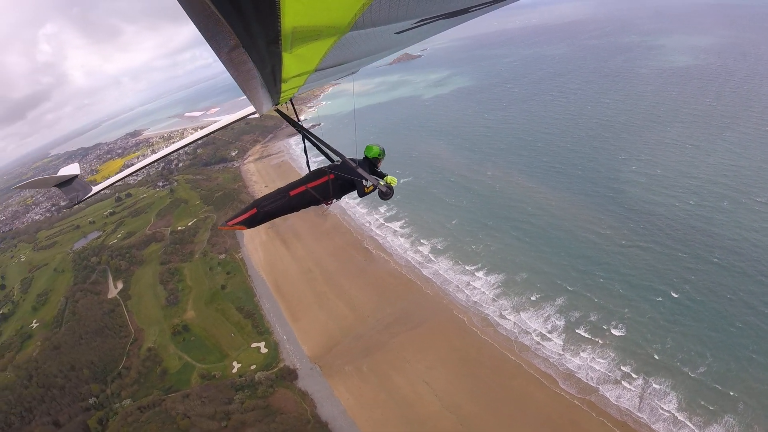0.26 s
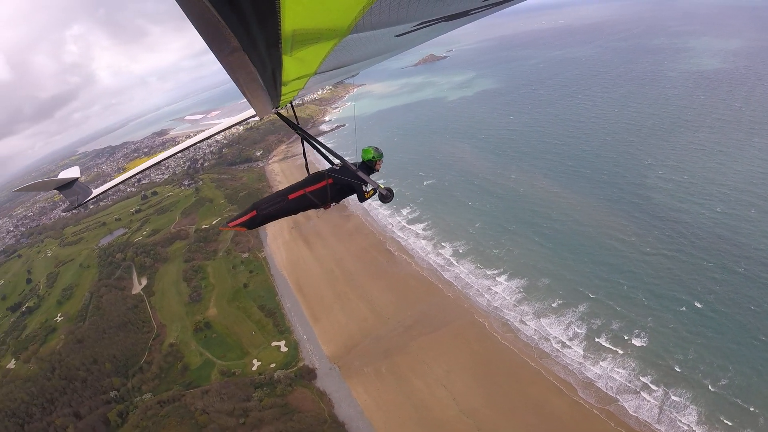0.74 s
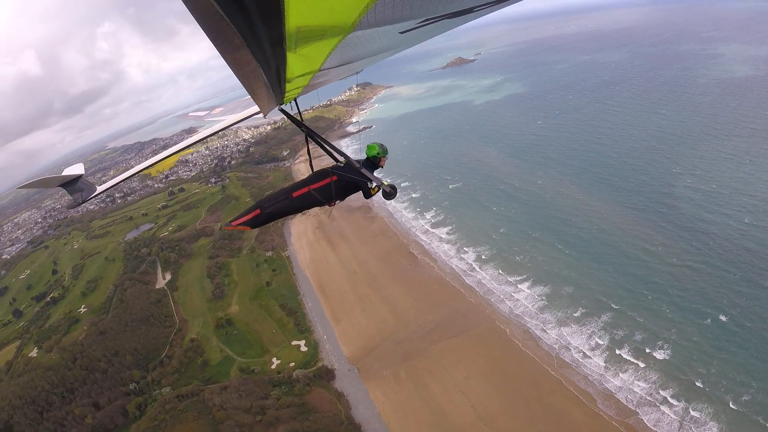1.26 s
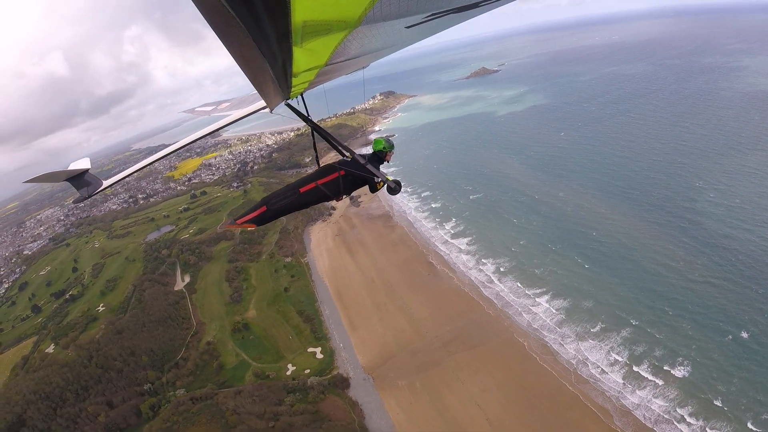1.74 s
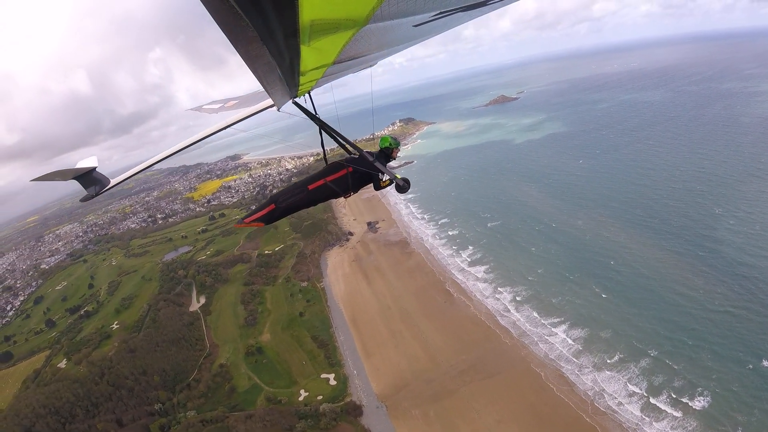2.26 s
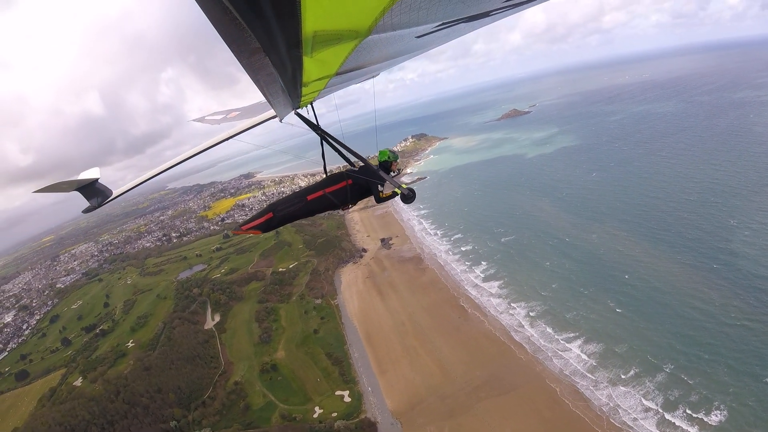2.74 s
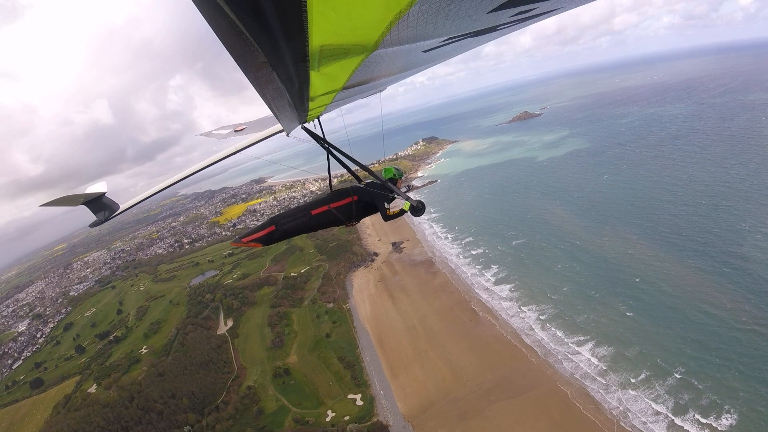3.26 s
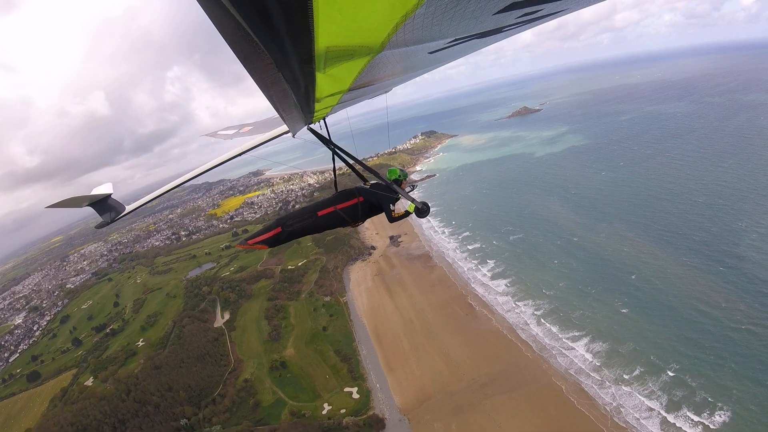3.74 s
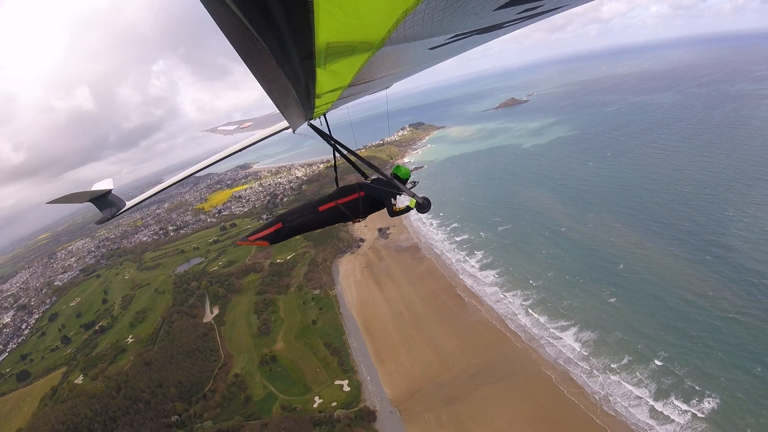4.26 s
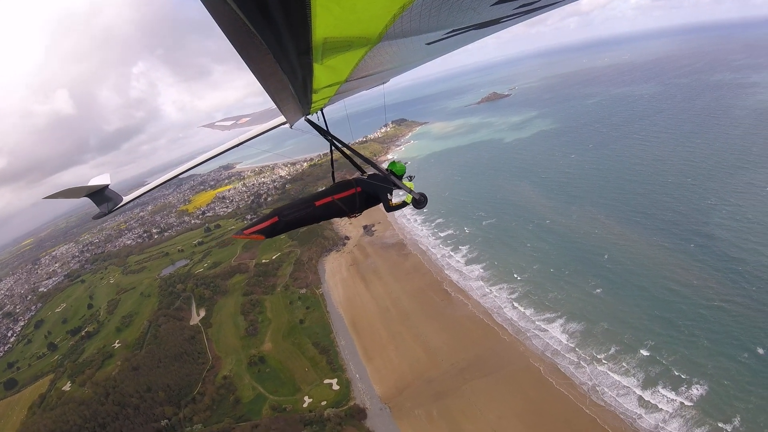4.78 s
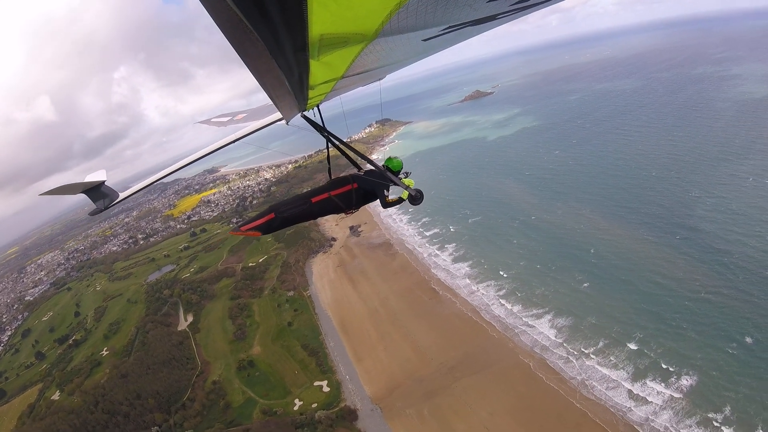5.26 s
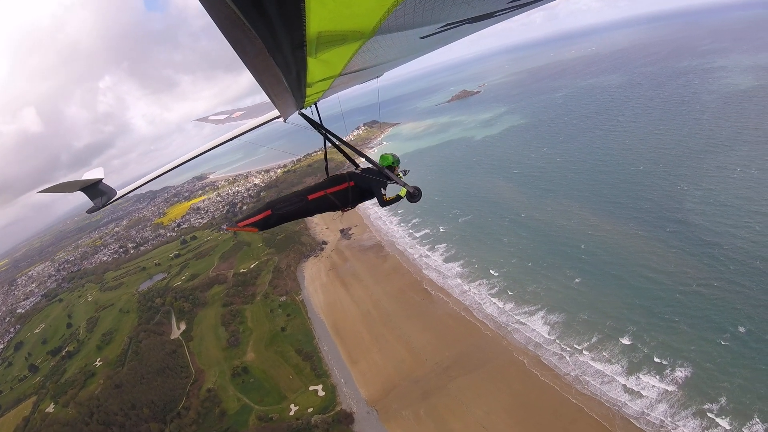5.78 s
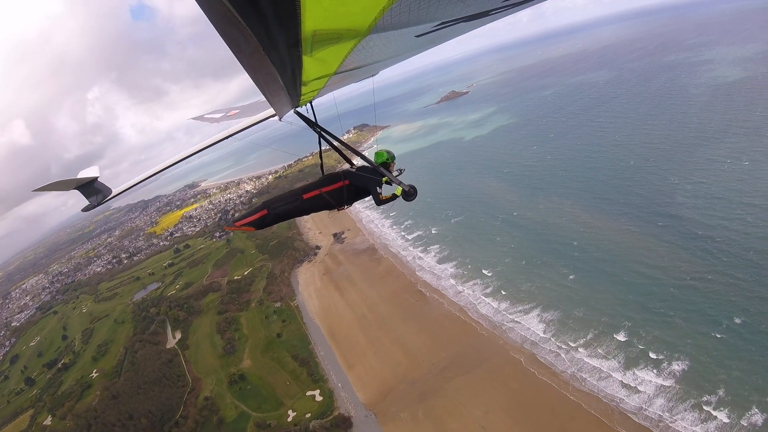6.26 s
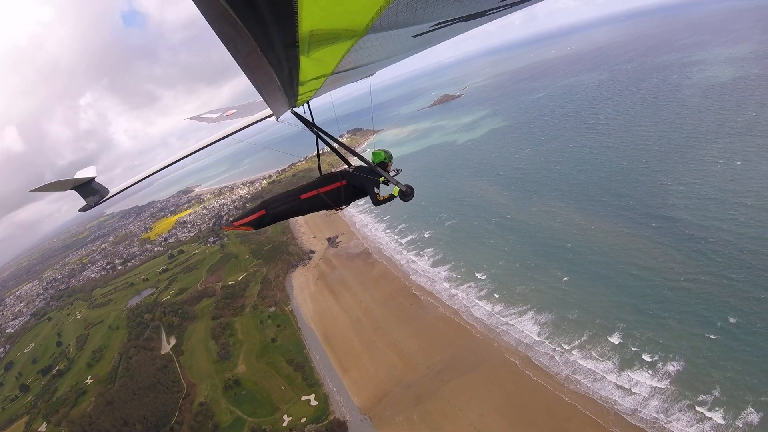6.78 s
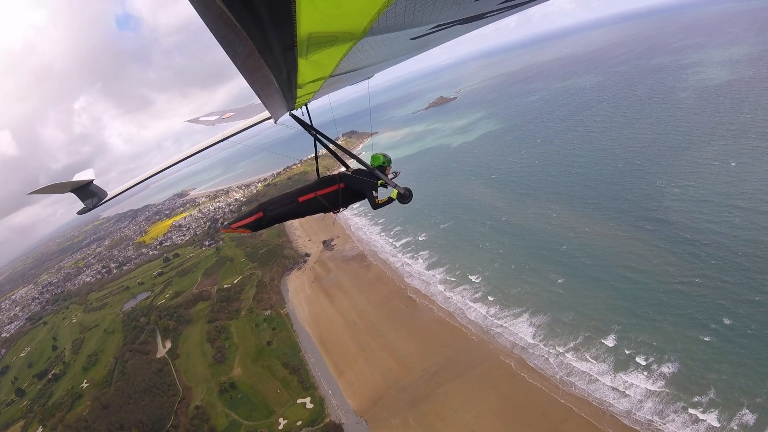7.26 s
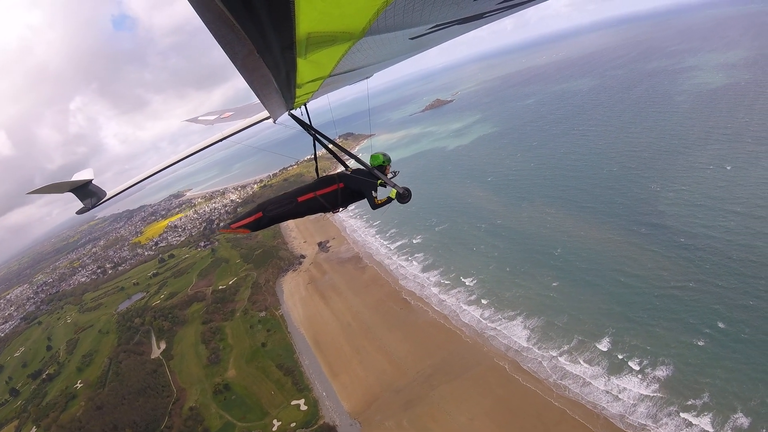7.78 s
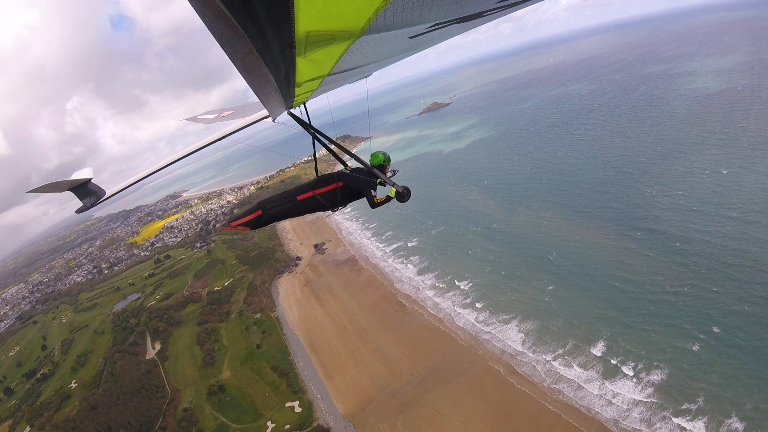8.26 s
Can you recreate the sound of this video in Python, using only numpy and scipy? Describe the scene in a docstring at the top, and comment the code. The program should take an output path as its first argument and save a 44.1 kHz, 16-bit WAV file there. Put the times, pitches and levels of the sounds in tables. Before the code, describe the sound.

Loud, lumpy wind buffets a microphone on a hang glider's wing, hissing at first, then roaring lower, with small ticks from the camera mount.

```python
"""A loud, lumpy wind with a hissing edge: a camera rides the wing of a hang glider easing out of a turn.
Eddies buffet the microphone as slow noise swings, and a fast limiter holds their bass down. Airspeed drives
filtered noise for the rush and hiss along the housing; as the wing levels, the camera slides into a roaring
wake. Gusts lift or dip these bands, and short filtered knocks make the mount tick over a faint random crackle."""
import sys
import numpy as np
from scipy import signal
from scipy.fft import rfft, irfft
from scipy.io import wavfile

SR = 44100
rng = np.random.default_rng(int(sys.argv[2]) if len(sys.argv) > 2 else 0)


def master(y):
    """Save y as 16-bit WAV."""
    cut = np.clip(np.atleast_2d(y).T, -1, 1)
    pcm = np.round(cut * 32767)  # scale
    wavfile.write(sys.argv[1], SR, pcm.astype(np.int16))


N = 375732

# All spectra are relative levels per Hz: the filtered sound is scaled to an rms or a peak afterwards.
# broad crack of the mount: (f/Hz, level/dB)
CRACK_SPECTRUM = [(1000, -12.5), (2500, 1.5), (4300, -2), (7000, -3.5), (8600, -15), (10000, -25),
                  (12000, -39), (15500, -45.5)]


def gain_of(db):
    """Turns decibels into amplitude."""
    return 10 ** (np.asarray(db) / 20)


def evened(x):
    """Scales a signal to an rms of one."""
    return x / np.sqrt(np.mean(x ** 2) + 1e-20)


def coloured(x, spectrum):
    """Filters x by a (f/Hz, level/dB) spectrum, without delay, and scales it to an rms of one."""
    hz, db = np.transpose(spectrum)
    f = np.fft.rfftfreq(len(x), 1 / SR)
    # straight lines in dB over log frequency
    level_db = np.interp(np.log(f + 1), np.log(hz + 1), db, left=-90, right=-110)
    return evened(irfft(rfft(x) * gain_of(level_db), len(x)))


def noise(spectrum):
    """Makes steady noise of the given colour, rms one."""
    return coloured(rng.standard_normal(N), spectrum)


def low_pass(x, hz, order):
    """Low-passes a signal without delay."""
    f = np.fft.rfftfreq(len(x), 1 / SR)
    return irfft(rfft(x) / np.sqrt(1 + (f / hz) ** (2 * order)), len(x))


def wander(hz):
    """Random motion of rms one, mostly slower than hz."""
    return evened(low_pass(rng.standard_normal(N), hz, order=2))


def curve(points):
    """Joins (t/s, level/dB) points by straight lines, sample by sample."""
    return np.interp(np.arange(N) / SR, *np.transpose(points))


def swell(middle_s, length_s, db):
    """A smooth rise and fall, or dip, in dB; length_s is its whole width."""
    phase = np.clip((np.arange(N) / SR - middle_s) / length_s, -0.5, 0.5)
    return db * np.cos(np.pi * phase) ** 2


def flight(cruise_db=-51, wake_from_s=2.3, wake_to_s=3.46):
    """Airspeed (dB over cruise), depth in the wake (0-1) and the gusts' lift of eddies, roar and rush (dB)."""
    # airspeed, given as the level of the hiss that it raises: (t/s, level/dB)
    airspeed = [(0.0, -45.5), (1.47, -45), (2.37, -47), (3.08, -53), (4.29, -53.5), (4.62, -55),
                (6.93, -50.5), (7.43, -51.5), (8.52, -51)]
    # gusts: (middle t/s, length/s, lift of the eddies/dB, lift of the roar/dB, lift of the rush/dB)
    gusts = [(0.85, 0.85, 1.5, 3.5, 1.1), (1.096, 0.46, 2, 3.5, 1.5), (1.22, 0.14, 1.5, 3.5, 1.5),
             (1.607, 0.58, 1.5, 1, 1.9), (2.014, 0.14, 0.5, -5, 0.5), (2.35, 0.45, 0.5, 3.5, 0.5),
             (2.85, 0.64, -1, 0, 0.8), (3.33, 0.77, 3.5, 2, 3), (3.633, 0.21, 3, 0, 0.5),
             (3.87, 0.24, 3.5, 2.5, -1), (4.033, 0.13, 1.5, 1.5, 0), (4.263, 0.14, 0, 2, 1),
             (4.704, 0.078, 5, 1.5, -1), (5.55, 0.52, 3, 1, -0.5), (8.01, 0.068, 0, 2, 0.8),
             (8.357, 0.13, 0.5, 1, 0.8)]
    speed_db = curve(airspeed) - cruise_db
    # the camera slides into the wake as the wing levels
    wake = np.interp(np.arange(N) / SR, [wake_from_s, wake_to_s], [0, 1])
    lifts_db = sum(swell(middle_s, length_s, np.array(dbs)[:, None]) for middle_s, length_s, *dbs in gusts)
    return speed_db, wake, *lifts_db


def limited_bass(pressure, ceiling_db=-5.0, limiter_hz=80):
    """A fast limiter: the smoothed envelope turns down whatever nears the ceiling."""
    load = low_pass(abs(signal.hilbert(pressure)), limiter_hz, order=2) / gain_of(ceiling_db)
    return pressure / (1 + load ** 6) ** (1 / 6)


def buffet(speed_db, roll_db, surge_db, buffet_db=-11.5, heave_db=-21.5, lumpy_db=1.0, swell_db=-1.0,
           upper_hz=100, crossover_hz=148):
    """Lumpy pressure swings over a slow heave of the air, their tallest peaks flattened by the limiter."""
    # pressure swings of the buffeting: (f/Hz, level/dB)
    swing_spectrum = [(20, -27), (38, -11.5), (50, -1), (62, 1), (90, 0.5), (135, -2), (160, -13.5),
                      (200, -36.5)]
    # slow heave of the air: (f/Hz, level/dB)
    heave_spectrum = [(5, -18), (11, 0.5), (22, -8.5), (36, 2), (50, -3), (65, -12), (100, -48.5)]
    # gain of the upper bass in the buffeting: (t/s, level/dB)
    upper_bass = [(0.1, -4.5), (0.5, 3), (1.1, 2), (1.4, -4), (2.3, 0), (3.2, -0.5), (4.7, 2.5),
                  (5.0, -0.5), (5.5, -1.5), (6.3, -3.5), (7.2, 2.5), (7.8, -1), (8.5, 5.5)]
    swing_level_db = buffet_db + 0.051 * speed_db + lumpy_db * wander(hz=15)
    swings = noise(swing_spectrum) * gain_of(swing_level_db)
    deep = low_pass(swings, upper_hz, order=6)
    upper = (swings - deep) * gain_of(curve(upper_bass))
    heave_level_db = heave_db + 0.8 * roll_db + surge_db + swell_db * wander(hz=0.95)
    heave = noise(heave_spectrum) * gain_of(heave_level_db)
    held = limited_bass(deep + upper + heave)
    return low_pass(held, crossover_hz, order=12)


def airflow(speed_db, wake, gust_eddy_db, gust_roar_db, gust_rush_db, eddy_db=-27.5, roar_db=-38.5, rush_db=-32.0,
            wake_eddy_db=4.5, wake_roar_db=10.5, eddy_puff_db=1.0, roar_puff_db=0.5):
    """Large eddies, wake roar and housing rush follow speed and gusts, and tremble with one turbulence."""
    # large eddies: (f/Hz, level/dB)
    eddy_spectrum = [(60, -12.5), (150, 3.5), (210, 0), (280, -2.5), (370, -8), (520, -14), (1200, -41)]
    # roar of the wake: (f/Hz, level/dB)
    roar_spectrum = [(200, -18.5), (360, -7), (460, 3), (620, 2.5), (800, -0.5), (1100, -10.5),
                     (1800, -17.5), (4000, -58.5)]
    # rush along the housing: (f/Hz, level/dB)
    rush_spectrum = [(200, -11.5), (500, -10), (800, -1), (1100, 1.5), (1500, -3), (2000, -10),
                     (2800, -20.5), (3700, -28), (4700, -35.5), (6000, -44), (12000, -80)]
    turbulence = wander(hz=35)
    puffs = wander(hz=20)
    eddy_level_db = eddy_db + 0.91 * speed_db + wake_eddy_db * wake + gust_eddy_db
    eddy_level_db = eddy_level_db + 1.0 * turbulence + eddy_puff_db * puffs
    roar_level_db = roar_db + 0.67 * speed_db + wake_roar_db * wake + gust_roar_db
    roar_level_db = roar_level_db + 1.3 * turbulence + roar_puff_db * puffs
    rush_level_db = rush_db + 0.76 * speed_db + gust_rush_db + 0.77 * turbulence
    eddies = noise(eddy_spectrum) * gain_of(eddy_level_db)
    roar = noise(roar_spectrum) * gain_of(roar_level_db)
    rush = noise(rush_spectrum) * gain_of(rush_level_db)
    return eddies + roar + rush


def flutter(speed_db, wake, lift_db, flutter_db=-41.5, wake_flutter_db=-4.0, ragged_db=1.8, ragged_hz=60):
    """Small eddies tear raggedly off the housing's edges, lifted by gusts and roll, sheltered in the wake."""
    # small eddies off the edges: (f/Hz, level/dB)
    flutter_spectrum = [(900, -17), (1600, 1), (2100, -0.5), (2800, -7.5), (3700, -18), (5000, -31.5)]
    level_db = flutter_db + 0.5 * speed_db + wake_flutter_db * wake + lift_db
    return noise(flutter_spectrum) * gain_of(level_db + ragged_db * wander(hz=ragged_hz))


def hiss(speed_db, hiss_db=-51.0, flicker_db=0.74):
    """The finest eddies hiss in a broad resonance near 6 kHz, flickering as they follow the airspeed."""
    # finest eddies: (f/Hz, level/dB)
    hiss_spectrum = [(3000, -29.5), (4000, -15.5), (4700, -19.5), (5100, -4), (5500, -4), (6000, -0.5),
                     (6700, -5), (7500, -6.5), (8500, -15.5), (10000, -24.5), (11500, -33), (13000, -55)]
    return noise(hiss_spectrum) * gain_of(hiss_db + speed_db + flicker_db * wander(hz=40))


def crackle(strain_db, calm_per_s=55, doubling_db=2.0, spread_db=3.0, level_db=-54.0, pitch_spread=0.15,
            crack_db=-10.0):
    """Faint random ticks of the mount at three pitches; strain makes them thicker and louder."""
    # ring of the crackle at its middle pitch: (f/Hz, level/dB)
    crackle_spectrum = [(1200, -21), (2100, 2), (2800, 1.5), (3700, -12.5), (4700, -19.5), (6500, -30)]
    per_s = calm_per_s * 2 ** (strain_db / doubling_db)
    size = gain_of(spread_db * np.minimum(rng.exponential(1, N), 2.5))
    clicks = size * (rng.random(N) < per_s / SR) * rng.choice([-1, 1], N)
    pitch = rng.integers(-1, 2, N)  # low, middle or high
    rings = np.zeros(N)
    for step in (-1, 0, 1):
        shifted = np.multiply(crackle_spectrum, [np.exp(pitch_spread * step), 1])
        rings += coloured(clicks * (pitch == step), shifted)
    cracks = gain_of(crack_db) * coloured(clicks, CRACK_SPECTRUM)
    return (evened(rings) + cracks) * gain_of(level_db + strain_db)


def ring(spectrum, size=384):
    """One sharp knock on a broad resonance of the housing, centred in a window of about 9 ms."""
    return coloured(signal.unit_impulse(size, "mid"), spectrum) * np.hanning(size)


def rebounding(knock, gap_s, share=0.5):
    """A knock and its weaker rebound a moment later, scaled to a peak of one."""
    pair = knock + share * np.roll(knock, round(gap_s * SR))
    return pair / abs(pair).max()


def add(mix, s, sound):
    """Mixes a sound in at time s."""
    part = mix[round(s * SR):][:len(sound)]
    part += sound[:len(part)]


def mount(dull_hz=2750, crack_trim_db=1.0, rebound_s=0.0005):
    """Distinct ticks of the camera mount: a broad crack, a dull ring of its own pitch and a bright ring."""
    # ticks: (t/s, dull pitch f/Hz, dull peak level/dB, bright peak level/dB, crack peak level/dB before trim)
    ticks = [(0.251, 2750, -22, -44, -47.5), (0.9113, 2500, -24, -31, -38), (0.9174, 2450, -29, -38, -36),
             (1.0653, 2630, -24, -34, -21), (1.0805, 2600, -19, -24, -33), (1.0934, 3000, -28, -36, -31),
             (1.187, 2900, -25, -42, -27), (1.3739, 3000, -34, -34, -31), (1.5053, 2800, -26, -38, -27),
             (1.537, 2870, -29, -37, -22), (1.6074, 3510, -25, -23, -28), (1.6145, 2780, -30, -33, -26),
             (1.639, 3100, -36, -32, -29), (1.6447, 3150, -29, -36, -17), (1.6533, 3460, -27, -33, -26),
             (1.6771, 3100, -34, -36, -30), (1.7838, 3100, -33, -35, -30), (1.7894, 2600, -33, -28, -33),
             (1.932, 2900, -34, -36, -34), (2.0135, 2630, -28, -34, -36), (2.0679, 2700, -33, -35, -31),
             (2.2638, 2900, -21, -28, -35), (2.3317, 3000, -33, -34, -29), (2.5185, 2930, -28, -13, -23),
             (2.5256, 2730, -25, -44, -42), (2.833, 3300, -33, -42, -33), (2.842, 3000, -35, -40, -34),
             (2.848, 2830, -29, -44, -35), (2.8621, 2900, -37, -33, -34), (3.035, 3080, -24, -32, -41),
             (3.231, 2700, -29, -56, -37), (3.341, 2240, -24, -50, -52), (3.4645, 2230, -23, -41, -35),
             (3.525, 2660, -36, -48, -37), (3.5624, 2490, -29, -40, -36), (3.6628, 2520, -23.5, -47, -41),
             (3.7868, 2500, -30, -47, -47), (3.939, 2520, -26, -53, -48), (4.116, 2720, -28, -49, -38),
             (4.155, 2700, -26.5, -25.5, -46), (4.594, 2730, -30, -52, -30), (4.742, 2800, -40, -40, -42),
             (4.784, 3260, -35, -50, -37), (4.8828, 2740, -26.5, -32, -40), (5.0089, 2800, -34, -50, -42),
             (5.273, 2500, -29, -41, -33), (5.912, 2200, -20.5, -41, -46), (5.9845, 2370, -30, -43, -42),
             (6.0213, 2500, -30, -47, -44), (6.4696, 2390, -25, -47, -50), (6.4819, 2720, -29, -43, -37),
             (6.5063, 2470, -34, -38, -37), (7.2177, 2600, -36, -46, -40), (7.609, 2450, -27, -50, -43),
             (7.921, 2500, -32, -47, -40), (8.1167, 2400, -29, -45, -39), (8.1309, 2450, -29, -46, -44)]
    # dull ring at the pitch dull_hz: (f/Hz, level/dB)
    dull_spectrum = [(1000, -26.5), (2000, -3), (2750, 12), (3600, -5.5), (4700, -18), (6500, -32.5)]
    # bright ring near 6 kHz: (f/Hz, level/dB)
    bright_spectrum = [(3500, -36), (4900, -19.5), (5600, 4), (6400, 2), (7200, -6), (8000, -19.5),
                       (8900, -18.5), (10000, -34), (12000, -47.5), (15000, -50.5)]
    out = np.zeros(N)
    crack = ring(CRACK_SPECTRUM)
    crack = crack / abs(crack).max()
    spreads = rng.uniform(0.6, 1.5, len(ticks))  # each tick rebounds a little sooner or later
    for (s, hz, dull_db, bright_db, crack_db), spread in zip(ticks, spreads):
        gap_s = spread * rebound_s
        dull = rebounding(ring(np.multiply(dull_spectrum, [hz / dull_hz, 1])), gap_s)
        bright = rebounding(ring(bright_spectrum), gap_s)
        tick = gain_of(dull_db) * dull + gain_of(bright_db) * bright
        tick += gain_of(crack_db + crack_trim_db) * crack
        add(out, s - len(tick) / 2 / SR, tick)  # the knock sits mid-window
    return out


def scene():
    """All the wind and the ticking mount at one microphone."""
    # the roll out of the turn heaves the air and strains the mount: (middle t/s, length/s, level/dB)
    roll = (1.95, 2.8, 4.7)
    # deep surges of the heave: (middle t/s, length/s, level/dB)
    surges = [(1.73, 0.24, 3), (2.198, 0.32, 8), (4.711, 0.27, 8)]
    speed_db, wake, gust_eddy_db, gust_roar_db, gust_rush_db = flight()
    roll_db = swell(*roll)
    surge_db = sum(swell(*surge) for surge in surges)
    bass = buffet(speed_db, roll_db, surge_db)
    flow = airflow(speed_db, wake, gust_eddy_db, gust_roar_db, gust_rush_db)
    fine = flutter(speed_db, wake, gust_rush_db + 0.3 * roll_db) + hiss(speed_db)
    strain_db = 0.38 * roll_db + 0.35 * speed_db
    return (bass + flow + fine + crackle(strain_db) + mount())[None]


def record(dry, edge_hz=15600):
    """The camera's steep band limit, with a few milliseconds of fade at either end."""
    band_limit = signal.butter(12, edge_hz, fs=SR, output="sos")
    limited = signal.sosfiltfilt(band_limit, dry)
    return limited * signal.windows.tukey(N, 0.001)


dry = scene()
out = record(dry)
master(out)
```